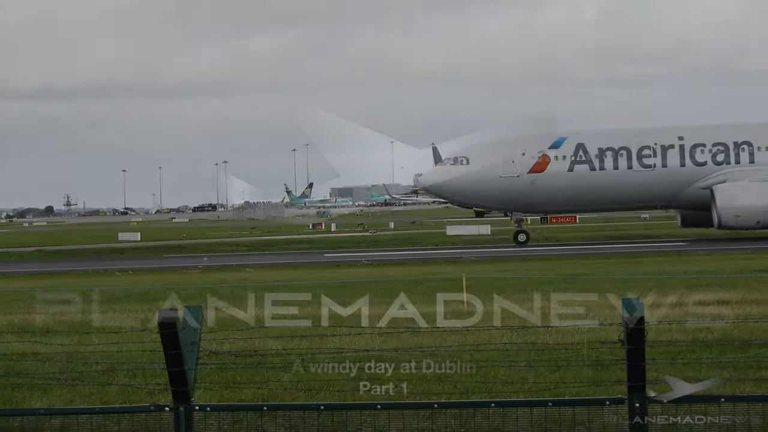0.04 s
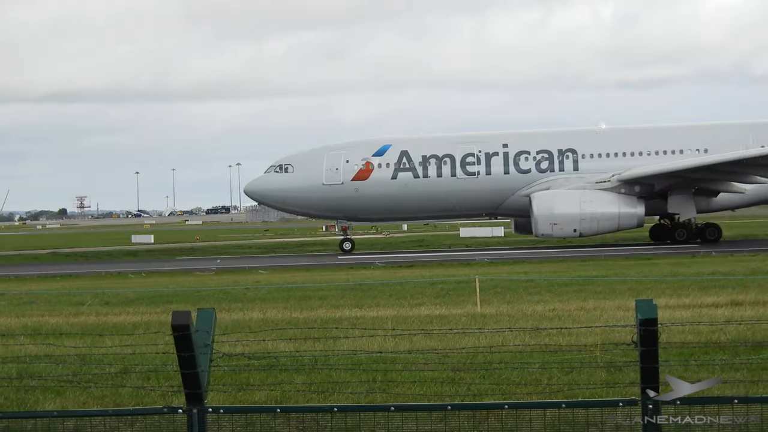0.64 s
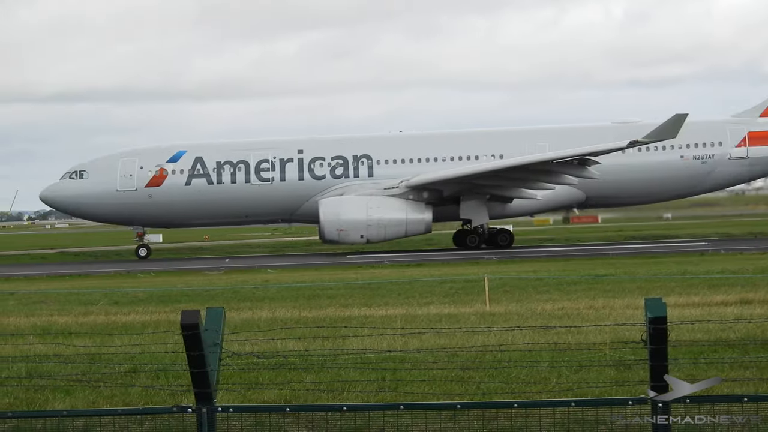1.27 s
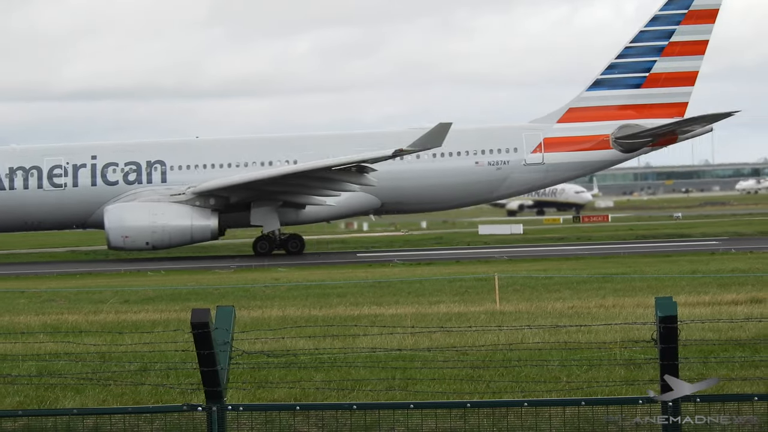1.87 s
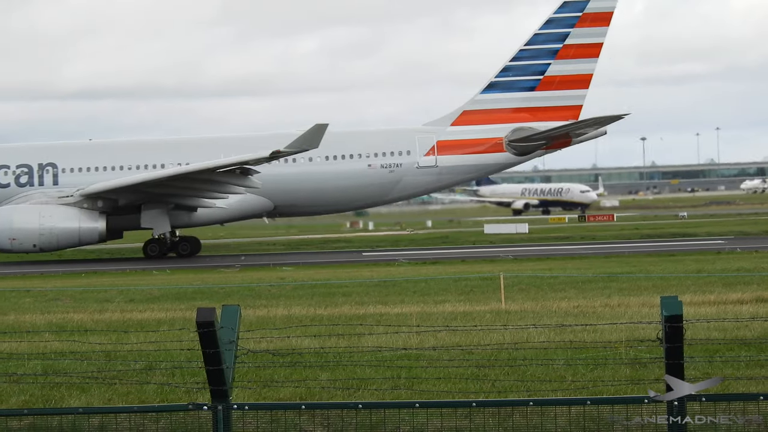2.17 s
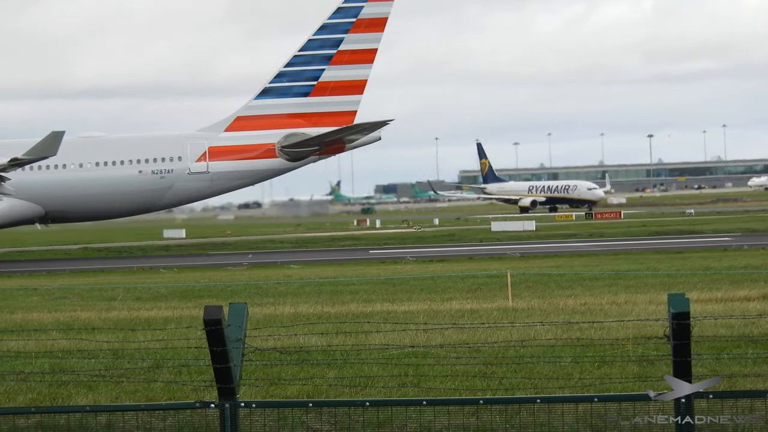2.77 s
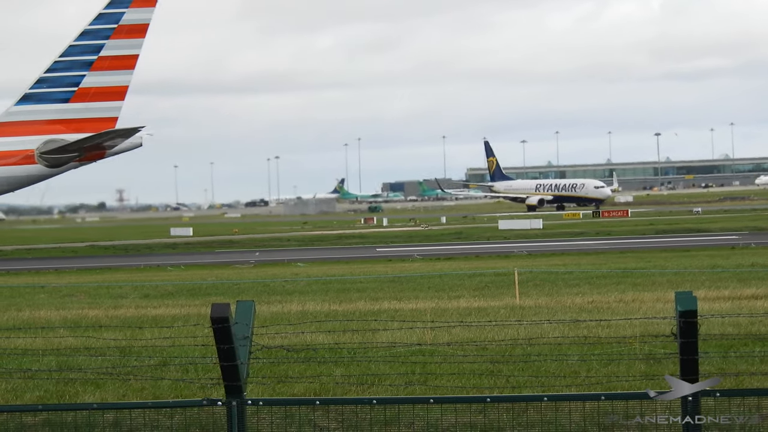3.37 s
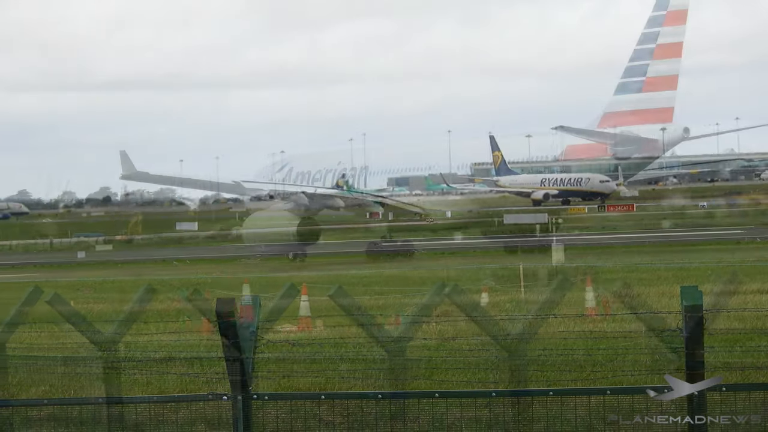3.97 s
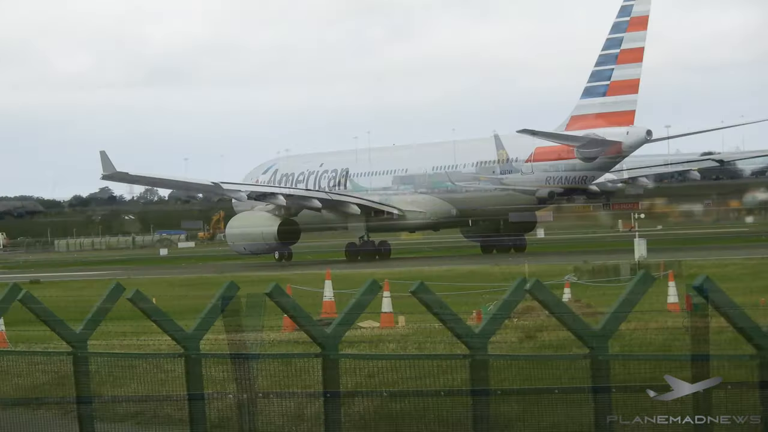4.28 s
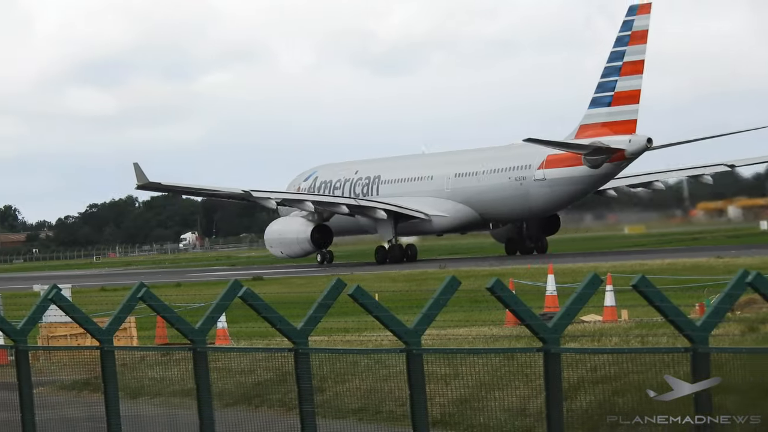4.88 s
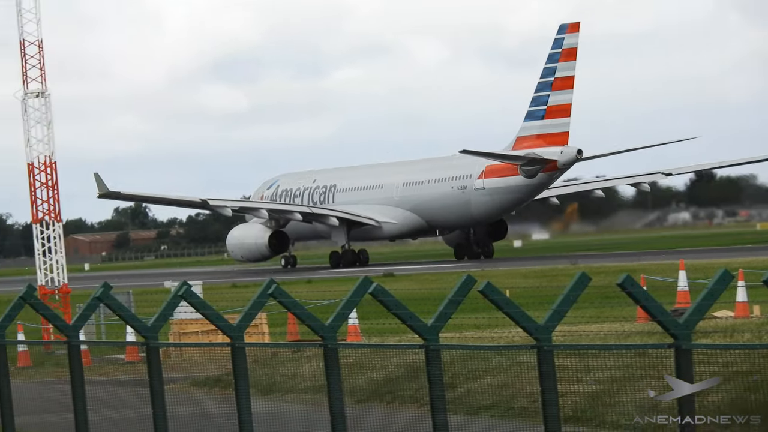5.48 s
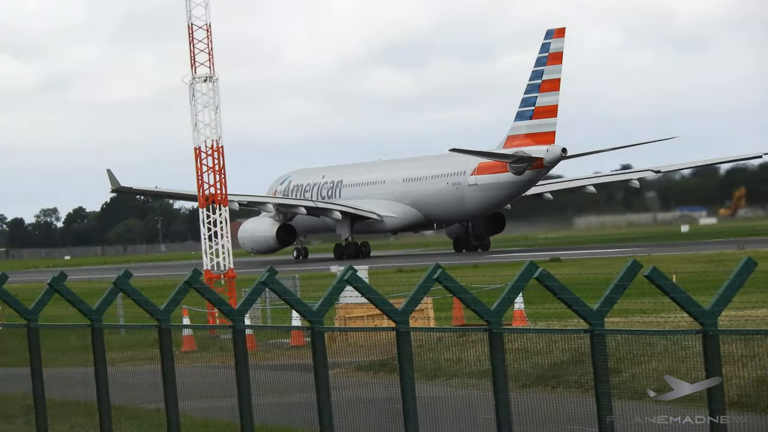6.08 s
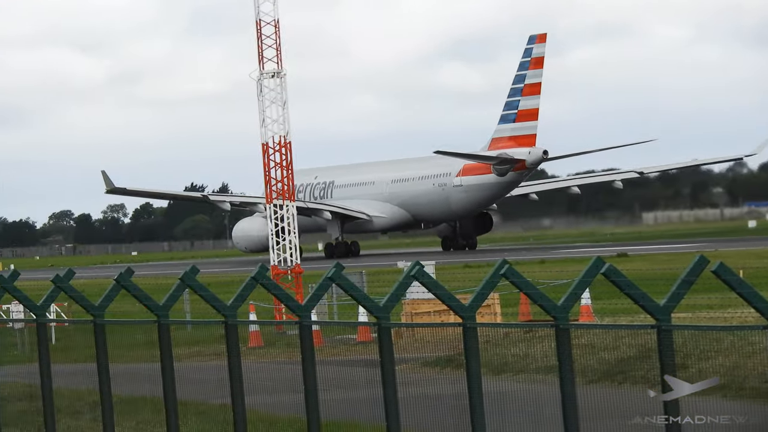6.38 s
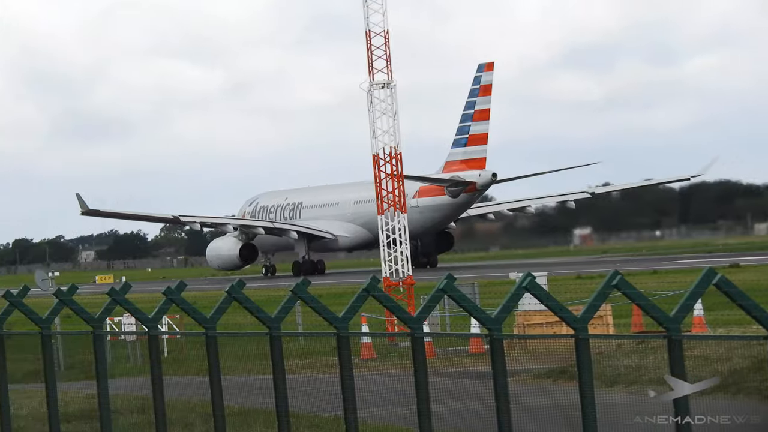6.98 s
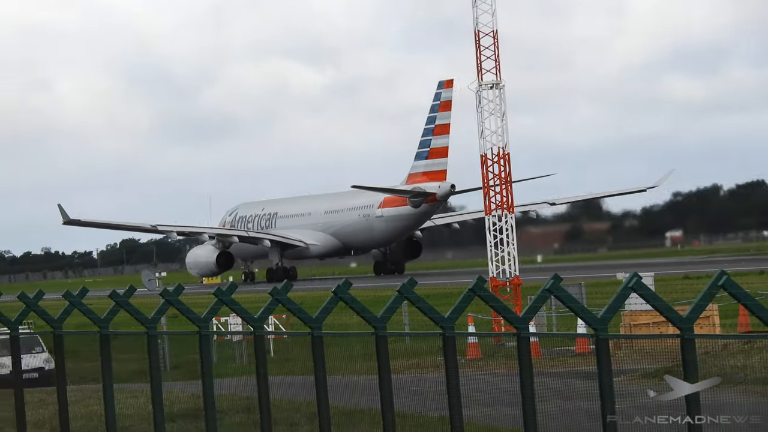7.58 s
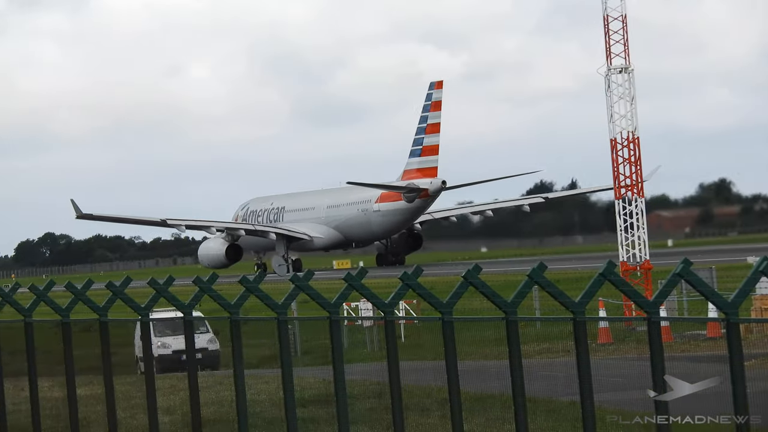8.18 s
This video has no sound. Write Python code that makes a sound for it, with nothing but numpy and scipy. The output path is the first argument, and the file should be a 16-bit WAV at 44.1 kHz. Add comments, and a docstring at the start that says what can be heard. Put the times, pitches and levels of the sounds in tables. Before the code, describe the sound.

A large jet airliner taxis past with a roaring, hissing exhaust that surges in the wind over a low, irregularly thumping rumble.

```python
"""A wide-body airliner taxis past an airfield fence on a windy day, side-on first, then from behind.
Its turbulent exhaust roars, hollowed by ground echoes and surging on the wind, and loses most of its
hiss astern. The fan blades hum briefly at the start. Underneath, a low jet rumble from the large
exhaust eddies throbs and thumps irregularly."""
import sys
import numpy as np
from scipy import signal
from scipy.fft import rfft, irfft
from scipy.io import wavfile
from scipy.ndimage import uniform_filter1d

SR = 44100
rng = np.random.default_rng(int(sys.argv[2]) if len(sys.argv) > 2 else 0)


def transcribe(signal):
    """Save signal, clipped to [-1, 1], as a 16-bit WAV file at the path in sys.argv[1]."""
    frames = np.atleast_2d(signal).T
    limited = np.clip(frames, -1, 1)
    pcm = np.round(limited * 32767).astype(np.int16)
    wavfile.write(sys.argv[1], SR, pcm)


N = 363384
TIME = np.arange(N) / SR


def gain_of(db):
    """Decibels to amplitude."""
    return 10 ** (np.asarray(db) / 20)


def unit_rms(x):
    """Scales to an rms of 1."""
    return x / np.sqrt(np.mean(x ** 2) + 1e-20)


def at_times(rows, t):
    """Each column of an envelope, read at the times t."""
    times, *columns = np.transpose(rows)
    return [np.interp(t, times, c) for c in columns]


def at_pitches(rows, hz):
    """Each column of an EQ curve, read on a log-frequency axis."""
    pitches, *columns = np.transpose(rows)
    return [np.interp(np.log(hz + 1), np.log(pitches + 1), c) for c in columns]


def drift(rate_hz):
    """Smooth random modulation of rms 1, rolling off above rate_hz."""
    hz = np.fft.rfftfreq(N, 1 / SR)
    return unit_rms(irfft(rfft(rng.standard_normal(N)) * np.exp(-(hz / rate_hz) ** 2), N))


def turbulence(shape):
    """White noise as short-time spectra of unit power."""
    return (rng.standard_normal(shape) + 1j * rng.standard_normal(shape)) / np.sqrt(2)


def frame_grid(size):
    """Times and frequencies of short-time spectra, a quarter frame apart."""
    hop = size // 4
    return np.arange(N // hop + 5) * hop / SR, np.fft.rfftfreq(size, 1 / SR)


def to_sound(spectra):
    """Short-time spectra to samples."""
    size = 2 * (spectra.shape[-1] - 1)
    _, sound = signal.istft(spectra, nperseg=size, noverlap=size * 3 // 4, time_axis=-2, freq_axis=-1)
    return np.sqrt(3) * sound[..., :N]


def ride_bands(colour, edges, faders, t, hz):
    """Rides each band of a spectrum to the level on its fader, with soft crossovers."""
    above = [1 / (1 + (edge / (hz + 1)) ** 12) for edge in edges[1:-1]]
    shares = -np.diff([np.ones_like(hz), *above, np.zeros_like(hz)], axis=0)
    lift_db = 0
    for low, high, share, db in zip(edges, edges[1:], shares, at_times(faders, t)):
        band_db = 10 * np.log10((colour[..., (hz >= low) & (hz < high)] ** 2).sum(-1))
        lift_db = lift_db + np.outer(uniform_filter1d(db, size=7) - band_db, share)
    return colour * gain_of(lift_db)


def scintillation_db(t, hz, base_db=1, mids_db=1.96, centre_hz=1250, octaves=0.96):
    """Moving air makes the roar shimmer in patches, most in the mids."""
    slow_noise = uniform_filter1d(rng.standard_normal((len(t), len(hz))), size=14, axis=0)
    patches = unit_rms(uniform_filter1d(slow_noise, size=5, axis=1))
    mids = np.exp(-(np.log2((hz + 1) / centre_hz) / octaves) ** 2)
    return patches * (base_db + mids * mids_db)


# Notches where echoes cancel the direct sound: (base centre [Hz], width [Hz], base gain [dB])
ECHO_NOTCHES = [(438.6, 116, -20), (942, 270, -4.5), (1251, 130, -10), (1907, 250, -10.5), (2674, 364, -9),
                (3345, 130, -6), (3970, 120, -6.5)]
# The notches sink in pitch as the aircraft rolls away: (time [s], depth [factor], pitch [factor])
ECHO_SWEEP = [(0, 0.59, 1.1), (.5, 0.69, 1.06), (1.2, 0.78, 1.025), (2.5, 0.92, 1.057), (3.6, 0.83, 1.033),
              (4.3, 1.1, 1.024), (5.6, 1.2, 0.99), (6.7, 1, 0.99), (8.2, 0.9, 0.96)]


def ground_echo(t, hz, amount=1, wander=0.0096):
    """Gain of the hollow comb that ground echoes cut; the wind bends each notch a little."""
    depth, slide = at_times(ECHO_SWEEP, t[:, None])
    jitter = rng.standard_normal((len(ECHO_NOTCHES), len(t), 1))
    bends = unit_rms(uniform_filter1d(uniform_filter1d(jitter, size=22, axis=1), size=14, axis=1))
    notch_db = 0
    for (base_hz, width, db), bend in zip(ECHO_NOTCHES, bends):
        centre_hz = base_hz * slide * (1 + wander * bend)
        notch_db += db / (1 + (2 * (hz - centre_hz) / width) ** 2)
    return gain_of(amount * depth * notch_db)


# Bell EQ moves: (time [s], half-length [s], centre [Hz], half-width [Hz], gain [dB])
# The last row lifts a very faint top hiss above 11 kHz near the end.
BAND_SWELLS = [(0.353, 0.8, 1040, 241, 7), (0.966, 0.056, 1020, 130, 3), (1.31, 0.078, 780, 70, 6),
               (.2, 0.2, 644, 90, -4.5), (0.198, .3, 154, 35, -3), (2.7, 1.28, 177, 44, -11.5),
               (0.802, 0.4, 412, 45, 4), (2.854, 0.29, 388, 34.6, 7.5), (2.992, 0.12, 2290, 300, 6),
               (3.276, 0.049, 2330, 280, -5), (3.464, 0.13, 1100, 110, 5), (3.7, 0.27, 328, 50, 2),
               (3.8, 0.66, 2640, 230, -6.5), (4.4, 0.28, 332, 70.4, -9.5), (4.778, 0.41, 960, 130, 0.5),
               (5.15, 0.18, 628, 80, 4.5), (5.451, 0.49, 937, 80.5, -8), (5.85, 0.36, 340, 60, 3),
               (6.138, 0.11, 1240, 129, -8), (6.756, 0.23, 324, 34.7, -16), (6.803, 0.34, 220, 39.7, 9.5),
               (7.35, 0.072, 664, 45, 14), (7.4, 0.75, 885, 89.5, -7), (7.55, 0.35, 170, 35, 4),
               (7.3, 0.76, 1950, 160, -4), (2.15, 0.56, 1570, 220, 2), (3.4, 0.11, 1680, 200, 5),
               (7.2, 1.6, 11600, 1200, 27)]


def band_swell_db(t, hz):
    """Single bands of the roar briefly swell or fade."""
    return sum(db * np.exp(-((t[:, None] - when) / length) ** 2 - ((hz - centre) / width) ** 2)
               for when, length, centre, width, db in BAND_SWELLS)


# Quick accents: (time [s], half-length [s], centre [Hz], half-width [octaves], gain [dB])
WIND_SURGES = [(0.7, 0.024, 840, 0.55, 10), (0.935, 0.073, 900, 0.49, 5.5), (1.21, .04, 170, .6, 4),
               (1.31, .035, 2300, .4, 4), (1.327, 0.04, 774, 0.77, 5), (2.15, 0.022, 750, 0.49, 5.5),
               (3.288, 0.08, 1390, 1, 1), (3.505, 0.052, 3520, 0.68, 5.5), (3.844, 0.13, 3860, 1.15, 5),
               (4.732, 0.026, 755, .35, -1.5), (4.78, 0.024, 1095, 0.21, 4.5), (4.82, 0.035, 1450, 0.3, 6),
               (6.392, 0.027, 1600, 0.44, 7.5), (6.556, 0.015, 1580, 0.43, 7),
               (6.887, 0.029, 745, 0.55, 4.5), (6.997, 0.043, 1100, 1.3, 5.5),
               (7.776, 0.027, 746, 0.63, 3.5), (7.857, 0.036, 200, .7, 3)]


def wind_surge_db(t, hz):
    """The wind carries parts of the roar over in short, bell-shaped surges."""
    return sum(db * np.exp(-((t[:, None] - when) / length) ** 2 - (np.log2((hz + 1) / f) / width) ** 2)
               for when, length, f, width, db in WIND_SURGES)


# The jet's tone, bright side-on and darker from behind: (frequency [Hz], relative level [dB])
SIDE_ON_EQ = [(35, -20), (115, -3.5), (175, 3.5), (250, -5.5), (700, 4.5), (1050, -0.5), (1600, 0.5),
              (2350, 1.5), (3000, -8.5), (4700, -11), (6700, -15), (9100, -15), (10300, -32), (11100, -79)]
ASTERN_EQ = [(35, -22), (110, 0.5), (200, 4), (700, -1), (1050, -7), (1600, 1), (2350, -12), (3000, -11),
             (4700, -23), (6700, -18.5), (9100, -41), (10300, -38.5), (11200, -59), (12800, -87)]
# Five bands, from the plume's large eddies to the nozzle's small ones: (edge [Hz])
ROAR_BANDS = [120, 450, 1300, 2750, 5500, 10000]
# Their faders: (time [s], plume roar [dB], core [dB], turbine rush [dB], nozzle hiss [dB], fizz [dB])
ROAR_FADERS = [(0.0, -30.5, -32, -32, -32, -37), (0.11, -25.5, -24.5, -27.5, -31, -33.5),
               (0.44, -18.5, -21, -24.5, -25, -28.5), (0.57, -28.5, -24.5, -22, -28.5, -28.5),
               (0.74, -19, -23.5, -23.5, -25.5, -28), (0.92, -20, -20.5, -22.5, -25.5, -27.5),
               (1.12, -20.5, -18, -21.5, -25, -26.5), (1.33, -20.5, -18.5, -19, -24, -24),
               (1.65, -19.5, -15.5, -18, -22.5, -23.5), (1.95, -21, -18.5, -17.5, -22.5, -24),
               (2.3, -22, -20, -22.5, -24.8, -25.5), (2.72, -22.5, -21, -19.5, -23, -23),
               (2.88, -20, -21.3, -23, -26, -25.5), (3.0, -22, -22.5, -18.5, -22, -24),
               (3.15, -18.5, -22.1, -22.5, -24, -23.5), (3.258, -22, -18, -18, -25.5, -24),
               (3.55, -24.5, -19.5, -18, -23.5, -25.5), (3.7, -22.5, -23.5, -21.5, -25, -25.5),
               (3.92, -30, -21.5, -23.5, -29, -27.5), (4.11, -27.5, -24.5, -26.5, -26.5, -26),
               (4.3, -23.5, -25, -25.5, -33, -33.7), (4.53, -18.5, -21, -24.5, -35, -46),
               (4.79, -19, -16, -24.5, -33.5, -48), (5.1, -22, -19.5, -25.5, -36, -49.5),
               (5.44, -25, -22.5, -27.5, -38, -53), (6.0, -26.5, -22, -28, -39.5, -51),
               (6.3, -25.5, -23, -30, -38, -46.5), (6.65, -20, -23.5, -26, -36, -46),
               (7.0, -20.5, -26.5, -28, -38, -45.5), (7.17, -24, -25, -28, -35.5, -46.5),
               (7.5, -20, -26.5, -27, -37, -47.5), (8.0, -24.5, -26.5, -30.5, -38.5, -51),
               (8.24, -23.5, -27, -28.5, -38.5, -49)]


def direct_roar(t, hz, astern):
    """Spectra of the exhaust turbulence, shimmering, swelling and hollowed by ground echoes."""
    shimmer_db = scintillation_db(t, hz)
    noise = turbulence(shimmer_db.shape)
    side_on_power = gain_of(at_pitches(SIDE_ON_EQ, hz)[0]) ** 2
    astern_power = gain_of(at_pitches(ASTERN_EQ, hz)[0]) ** 2
    tone = np.sqrt((1 - astern) * side_on_power + astern * astern_power)
    colour = tone * ground_echo(t, hz) * gain_of(band_swell_db(t, hz) + shimmer_db)
    return noise * ride_bands(colour, ROAR_BANDS, ROAR_FADERS, t, hz) * gain_of(wind_surge_db(t, hz))


# Tone of the diffuse wash: (frequency [Hz], relative level [dB])
WASH_EQ = [(40, -17), (100, -10), (170, -12), (290, -5), (450, -4.5), (750, 2), (1500, -0.5), (2300, 0),
           (3200, 0), (5000, 1), (9000, -1), (10300, -10), (11200, -67), (13000, -69)]
# Its three bands: (edge [Hz])
WASH_BANDS = [120, 450, 2750, 10000]
# Their faders, dipping once the aircraft has turned away: (time [s], bass [dB], mids [dB], treble [dB])
WASH_FADERS = [(0.0, -43, -36, -37), (0.3, -39, -29, -32), (1.0, -38, -27.5, -29.5), (1.7, -39, -28.5, -28),
               (2.4, -44, -32, -31), (3.5, -49, -33, -27.5), (4.1, -49, -34.5, -30.5),
               (4.7, -40, -45.5, -50), (5.6, -49, -48, -51), (6.2, -44, -45.5, -47), (6.8, -50, -35, -42),
               (7.4, -42, -35, -39.5), (8.24, -53, -38, -45)]


def scattered_roar(t, hz, trim_db=-1.15):
    """Spectra of the roar scattered off the airfield, a wash that partly fills the notches."""
    noise = turbulence((len(t), len(hz)))
    colour = gain_of(at_pitches(WASH_EQ, hz)[0]) * ground_echo(t, hz, amount=0.2)
    return noise * ride_bands(colour, WASH_BANDS, WASH_FADERS, t, hz) * gain_of(trim_db)


# The aircraft turns its tail to us: (time [s], crossfade [0 side-on, 1 astern])
TURN_AWAY = [(3.7, 0.41), (4.0, 0.65), (4.25, 0.79), (4.5, 0.72)]
# Stereo colour when fully side-on: (frequency [Hz], left minus right [dB], left phase lead [rad])
STEREO_EQ = [(300, 1, 0.03), (700, 1.6, -0.13), (1750, 0.5, 0), (2020, -1, .05), (2600, -0.3, 0.08),
             (3080, 5.5, -0.1), (3700, 1, 0), (4700, -0.5, -0.35), (5600, 5, -0.45), (6200, 2, 0.14),
             (7500, 3.5, .42), (8300, -5.5, 0), (9000, 2, -0.42), (10300, 1, -.15)]
# The roar is panned mostly a little to the right: (time [s], left minus right [dB])
ROAR_PAN = [(0, -1.5), (2, -1.2), (3.6, 0.3), (4.4, -0.5), (8.2, -1.5)]


def jet(flutter_db=0.56, astern_tilt=0.48):
    """Direct roar as mid, scattered roar as side, coloured differently by two microphone ports."""
    t, hz = frame_grid(2048)
    astern = at_times(TURN_AWAY, t)[0][:, None]
    mid = direct_roar(t, hz, astern)
    side = scattered_roar(t, hz)
    tilt_db, lead = at_pitches(STEREO_EQ, hz)
    tilt = gain_of(tilt_db / 2 * (1 - astern + astern * astern_tilt))
    port = tilt * np.exp(0.5j * lead * (1 - astern))
    roar = to_sound(np.array([(mid + side) * port, (mid - side) / port]))
    flutter = gain_of(flutter_db * drift(rate_hz=25))  # eddies on the way shake the whole roar
    pan = gain_of(np.outer([0.5, -0.5], at_times(ROAR_PAN, TIME)[0]))
    return roar * flutter * pan


# The fan's opening hum: (time [s], pitch [Hz], relative level [dB])
FAN_HUM = [(0, 314, -38), (.2, 313, -25.5), (.47, 312, -22.5), (.58, 313, -55), (.8, 317, -26),
           (1.0, 319, -42), (1.2, 319, -54)]


def fan(trim_db=-1, waver=0.0117, flutter_db=2.5):
    """The blade-passing tone, beamed forward and all but gone once the intake has passed."""
    hz, db = at_times(FAN_HUM, TIME)
    cycles = np.cumsum(hz * (1 + waver * drift(rate_hz=11))) / SR
    level = gain_of(trim_db + db + flutter_db * drift(rate_hz=10))
    return np.sqrt(2) * np.sin(2 * np.pi * cycles) * level


# The running bed of the rumble: (time [s], relative level [dB])
RUMBLE_BED = [(0.0, -38), (0.1, -23), (0.45, -20), (0.7, -14.5), (1.0, -19.5), (1.4, -24.5), (1.9, -23),
              (2.35, -19), (2.7, -28), (3.1, -21), (3.6, -23), (4.2, -19), (4.6, -19), (5.05, -31),
              (5.35, -19.5), (5.8, -26), (5.97, -18), (6.15, -26), (6.4, -19), (6.8, -25), (7.2, -19),
              (7.6, -21.5), (7.97, -22), (8.15, -18), (8.24, -14)]
# Thumps that punch through the bed: (time [s], length [s], peak level [dB])
RUMBLE_THUMPS = [(0.068, 0.056, -19), (0.147, 0.039, -26), (0.307, 0.069, -16), (0.377, 0.047, -13.6),
                 (0.48, 0.022, -6), (0.556, 0.02, -11), (0.808, 0.029, -16), (0.918, 0.048, -14),
                 (1.013, 0.037, -12), (1.19, 0.031, -14), (1.263, 0.077, -16), (1.604, 0.033, -14),
                 (1.673, 0.038, -11), (1.824, 0.032, -17), (1.939, 0.063, -12.5), (2.05, 0.043, -14.5),
                 (2.243, 0.073, -15), (2.512, 0.032, -22), (2.574, 0.036, -16.2), (2.632, 0.028, -16.5),
                 (2.815, 0.068, -13.5), (3.03, 0.033, -16.5), (3.278, 0.033, -19), (3.363, 0.1, -20),
                 (3.946, 0.05, -15.9), (4.15, 0.076, -15.5), (4.39, 0.074, -15), (4.555, 0.032, -17),
                 (4.723, 0.036, -11.5), (4.886, 0.041, -11), (5.003, 0.059, -15), (5.151, 0.045, -15),
                 (5.422, 0.061, -19), (5.575, 0.048, -17), (5.69, 0.049, -13.5), (5.79, 0.066, -20),
                 (5.887, 0.053, -14.9), (6.092, 0.05, -13), (6.183, 0.039, -17.0), (6.373, 0.043, -10.5),
                 (6.492, 0.046, -13), (6.617, 0.036, -20), (6.699, 0.038, -17.8), (6.78, 0.039, -19),
                 (6.87, 0.1, -15.2), (7.022, 0.071, -17.6), (7.316, 0.04, -18), (7.446, 0.046, -14.5),
                 (7.568, 0.042, -13.7), (7.734, 0.034, -15.6), (7.833, 0.054, -13), (7.914, 0.072, -14),
                 (8.045, 0.052, -13)]


def rumble_level(bed_trim_db=-1, throb_db=1):
    """The low jet rumble throbs and thumps irregularly; bed and thumps add in power."""
    bed = gain_of(bed_trim_db + at_times(RUMBLE_BED, TIME)[0] + throb_db * drift(rate_hz=21))
    thump_power = sum(gain_of(db) ** 2 * np.exp(-6 * ((TIME - when) / length) ** 2)
                      for when, length, db in RUMBLE_THUMPS)
    return np.sqrt(bed ** 2 + thump_power)


# Base tone of the rumble: (frequency [Hz], relative level [dB])
RUMBLE_EQ = [(10, -37), (22, -28), (31, -26), (43, -7), (55, -3), (73, 2), (90, -3), (110, -8.5),
             (160, -33), (400, -51), (1500, -83)]
# The eddies slow astern and the rumble sinks: (time [s], centre [Hz], EQ steepness [factor])
EDDY_SWEEP = [(0, 72, 1.5), (.8, 71.5, 0.63), (1.4, 75, 1.2), (3, 79.5, 1.45), (4.4, 75.4, 0.98),
              (5.2, 70.5, 1.3), (6.0, 69.5, 2.3), (6.6, 63.5, 0.69), (7.5, 63.4, 1), (8.24, 59.4, 2.6)]


def jet_rumble(base_hz=72, side_db=-26, band_hz=(33, 135)):
    """Large exhaust eddies rumble almost in mono; their whole spectrum slides with the eddy rate."""
    t, hz = frame_grid(8192)
    centre_hz, steepness = at_times(EDDY_SWEEP, t[:, None])
    colour = gain_of(steepness * at_pitches(RUMBLE_EQ, hz * base_hz / centre_hz)[0])
    mid, side = to_sound(colour * turbulence((2, *colour.shape)))
    rumble = mid + np.outer([1, -1], side) * gain_of(side_db)
    # flatten the noise's own swings so that the envelope sets the level
    power = uniform_filter1d(uniform_filter1d(mid ** 2, size=1700), size=1100)
    thumps = rumble * rumble_level() / np.sqrt(power + 1e-12)
    return signal.sosfiltfilt(signal.butter(2, band_hz, "bandpass", fs=SR, output="sos"), thumps)


def scene():
    """Jet roar, fan hum and low rumble, mixed in stereo."""
    return jet() + fan() + jet_rumble()


def record(dry):
    """Soft-clips the highest peaks just under full scale, then cuts the top above 13 kHz."""
    rounded = dry / (1 + abs(dry) ** 24) ** (1 / 24)
    high_cut = signal.firwin(401, 13000, window=("kaiser", 9), fs=SR)
    return signal.oaconvolve(rounded, high_cut[None], "same")


dry = scene()
out = record(dry)
transcribe(out)
```